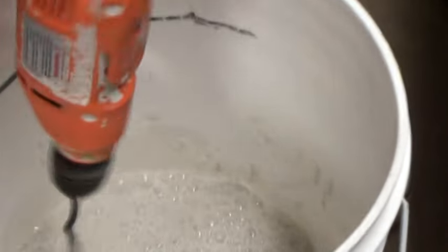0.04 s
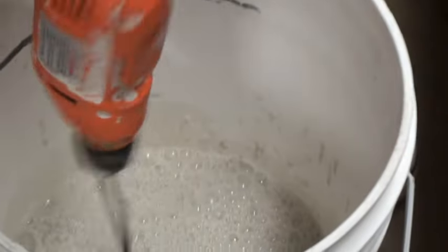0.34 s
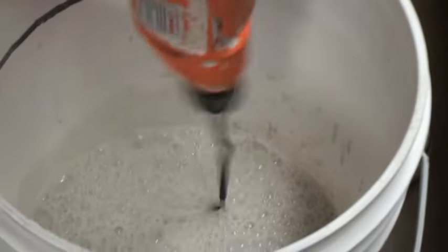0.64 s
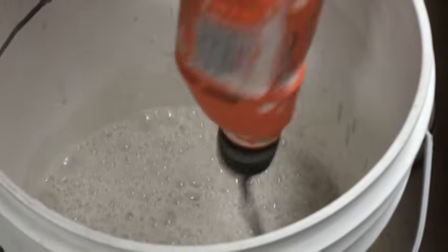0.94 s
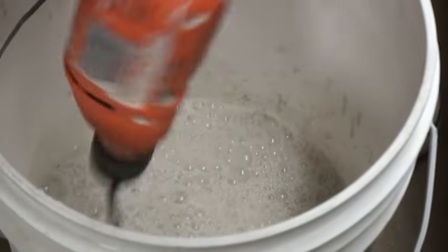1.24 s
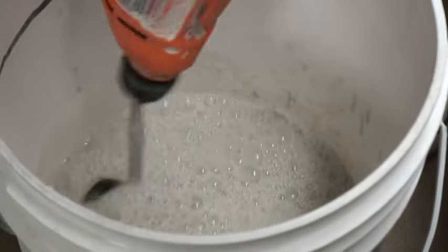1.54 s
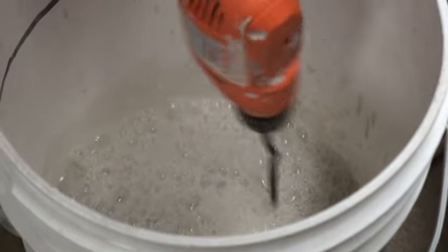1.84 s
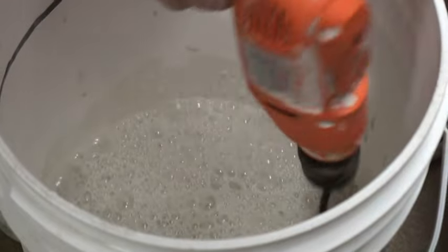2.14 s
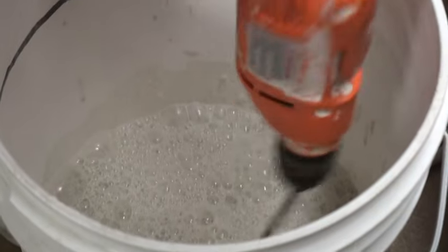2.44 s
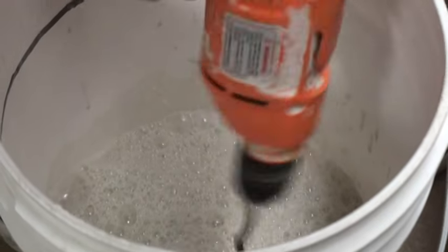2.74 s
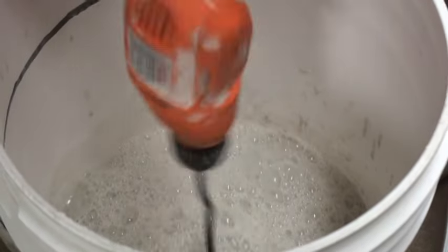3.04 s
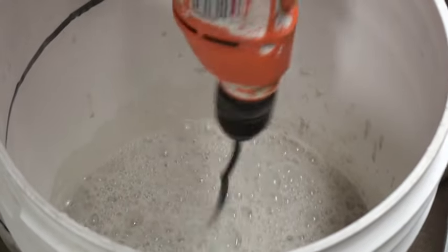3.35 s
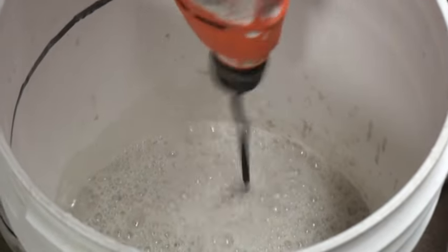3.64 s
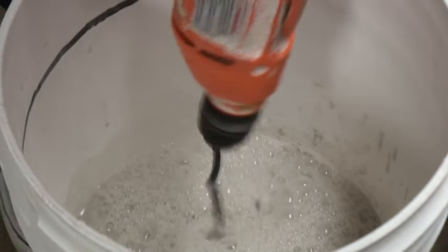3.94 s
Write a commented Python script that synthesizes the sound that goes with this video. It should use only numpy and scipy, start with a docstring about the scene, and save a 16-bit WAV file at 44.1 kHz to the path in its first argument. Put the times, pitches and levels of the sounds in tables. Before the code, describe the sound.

Close up in a room, an electric drill starts fast and raspy, sinks low, revs up, sinks again and picks up. Its wire stirrer knocks hollowly against a plastic bucket, twice hard, while water churns quietly underneath.

```python
"""An electric drill spins a bent wire in a plastic bucket of soapy water. It starts fast: the motor
whines, brushes and gears rasp, the water churns and the bucket hums along. After about a second
the wire knocks on the wall several times, once hard. The trigger eases and the drill sinks low
and quiet. Just past two seconds it speeds up, with another hard knock. It slows again around
three seconds, then picks up once more, with a few lighter knocks along the way."""
import sys
import numpy as np
from scipy import signal
from scipy.fft import rfft, irfft
from scipy.io import wavfile

SR = 44100
rng = np.random.default_rng(int(sys.argv[2]) if len(sys.argv) > 2 else 0)


def generate_wav(sig):
    """Save sig (samples, or channels by samples) to the path in sys.argv[1] as 16-bit PCM at SR."""
    pcm = np.round(np.clip(np.atleast_2d(sig).T, -1, 1) * 32767).astype(np.int16)
    wavfile.write(sys.argv[1], SR, pcm)


N = 176400   # 4 seconds
T = np.arange(N) / SR


# How fast the trigger makes the motor turn: (time [s], speed [turns per second])
MOTOR_SPEED = [(0, 502), (.13, 514.5), (.29, 525), (.45, 512), (.61, 496), (.72, 450), (.86, 446),
               (1.02, 416), (1.22, 484), (1.3, 457), (1.54, 314), (1.66, 255), (2.2, 280), (2.27, 305),
               (2.32, 362), (2.46, 463), (2.54, 475), (2.64, 498), (2.8, 474), (2.88, 426), (2.95, 336),
               (3.05, 340), (3.13, 272), (3.34, 275), (3.45, 328), (3.6, 397), (3.75, 448), (4, 437)]
def motor_speed():
    """The motor follows the trigger, with a slight wobble."""
    return in_time(MOTOR_SPEED) * (1 + 0.005006 * drift(25.6))


FULL_SPEED_HZ = 532
# How loud the drill is overall: (time [s], level [dB])
DRILL_LEVEL = [(0, -28.5), (.27, -29), (.5, -27.5), (.78, -29), (1.0, -28.5), (1.14, -27.5), (1.3, -28),
               (1.52, -36.5), (1.7, -42), (1.84, -45), (1.89, -38.5), (2.15, -41), (2.25, -37), (2.29, -33),
               (2.46, -28.5), (2.7, -28.5), (2.9, -30.5), (3.13, -39.5), (3.3, -37.5), (3.48, -32.5),
               (3.7, -30), (4, -30)]
def drill(speed, angle):
    """All the drill's sounds together. Tones, whines and above all the buzz grow with speed."""
    pace = speed / FULL_SPEED_HZ
    pitched = housing(motor_tones(angle) * pace ** 2.2 + whines(angle) * pace ** 3.8 + growl(angle))
    chuck_angle = angle / 15.5   # gears slow down the chuck, the clamp that holds the wire
    scraping = friction(chuck_angle)
    swell = 1 + 0.015 * np.cos(chuck_angle)   # once per chuck turn
    flicker = swell * from_db(1.03 * drift(64))
    return from_db(in_time(DRILL_LEVEL)) * (rasp(scraping * flicker) + pitched + buzz(flicker) * pace ** 14)


# The motor's tones: (pitch [times the motor speed], level at full speed [dB])
MOTOR_TONES = [(1, -16.5), (2, -20.5), (3, -24.5)]
TONE_ROUGHNESS = .48
def motor_tones(angle):
    """The spinning motor hums; each tone trembles in strength and timing."""
    tones = 0
    for multiple, db in MOTOR_TONES:
        strength = from_db(db) * (1 + TONE_ROUGHNESS * drift(35))
        tones += strength * np.sqrt(2) * np.sin(multiple * (angle + .33 * drift(42)))
    return tones


# Whines of gears and brushes: (pitch [times the motor speed], level at full speed [dB])
ROUGH_WHINES = [(7.15, -17.5), (7.75, -14), (10.9, -16), (12.1, -14), (15.7, -12.5)]
def whines(angle, smear=0.035):
    """Gears and brushes make rough, high tones that follow the motor."""
    return sum(from_db(db) * smeared(multiple * angle, smear * multiple * FULL_SPEED_HZ)
               for multiple, db in ROUGH_WHINES)


# How strong the growl is within the drill: (time [s], level [dB])
GROWL_LEVEL = [(0, -16), (.78, -28.5), (.88, -13.5), (1.05, -18), (1.4, -17.5), (2.35, -26), (2.6, -12.5),
               (2.85, -14), (3.1, -19.5), (3.9, -18.5)]
def growl(angle):
    """Gear teeth meet unevenly and make one very rough tone."""
    return from_db(in_time(GROWL_LEVEL)) * smeared(4.85 * angle, width_hz=320)


def friction(chuck_angle, bumps=1500, gear_share=.45):
    """Gear grit that repeats on every chuck turn, hiss from fan and brushes, and chattering clicks."""
    bump_angles = np.linspace(0, 2 * np.pi, bumps, endpoint=False)
    grit = rms_one(np.interp(chuck_angle, bump_angles, rng.standard_normal(bumps), period=2 * np.pi))
    hiss = rng.standard_normal(N)
    chatter = from_db(-7.5) * rms_one(clicks(per_s=500, spread_db=2.5))
    return np.sqrt(gear_share) * grit + np.sqrt(1 - gear_share) * hiss + chatter


# The rasp's tone, from bass to treble: (frequency [Hz], level [dB])
RASP_COLOUR = [(150, -21.5), (400, -12), (850, -5.5), (1200, -11.5), (1900, -5), (3000, -3), (4800, -4),
               (6600, 0), (7800, -4.5), (9000, -10.5), (10500, -8), (14500, -18), (16000, -57)]
def rasp(scraping):
    """The scraping of brushes and gears comes through the housing as a bright rasp."""
    return from_db(-1.5) * rms_one(housing(coloured(scraping, RASP_COLOUR)))


# Where the housing buzzes: (frequency [Hz], width [Hz], level at full speed [dB])
BUZZ_BANDS = [(1500, 110, -9.5), (3480, 450, -9.5), (5890, 460, -6), (6230, 1000, -0.5),
              (10600, 860, -11.5)]
def buzz(flicker):
    """The housing buzzes in bands of flickering noise."""
    return sum(from_db(db) * resonant(rng.standard_normal(N) * flicker, hz, width)
               for hz, width, db in BUZZ_BANDS)


# Where the drill's shell rings: (frequency [Hz], width [Hz], boost [dB])
HOUSING_RINGS = [(1446, 67, 7.5), (1638, 50, 5.5), (2260, 510, 2), (2655, 73, 5.5), (3783, 440, 5.5),
                 (4450, 290, 3.5), (5760, 630, 2.5)]
def housing(x):
    """The shell strengthens any sound near its own ringing pitches."""
    return boosted(x, HOUSING_RINGS)


# The wire's hits: (time [s], thud [dB], thud's treble limit [Hz], boom [dB], tick [dB], tick centre [Hz])
WIRE_HITS = [(.187, -40, 2520, -37, -43, 2960), (0.456, -43, 2480, -49, -36, 3000),
             (.918, -34, 400, -39, -50, 2500), (0.974, -26, 398, -33, -41, 2500),
             (1.017, -44, 400, -36, -31, 2500), (1.0707, -14, 775, -22.5, -21.5, 2620),
             (1.176, -26, 2996, -28, -22, 3970), (1.286, -30, 1400, -30, -28, 7935),
             (1.338, -29, 1700, -24.5, -46, 1500), (1.455, -35, 2500, -38, -33, 2500),
             (2.2628, -26.5, 800.8, -29, -26.5, 3500), (2.3923, -16.5, 1620, -21.5, -32, 4000),
             (2.606, -33.5, 1987, -35.5, -33, 2996), (2.737, -31, 600.3, -34, -48, 2500),
             (2.844, -30, 397, -37, -45, 2500), (3.193, -28, 600, -30.5, -55, 2500),
             (3.539, -34.5, 1180, -37, -34.5, 2500), (3.703, -34, 1100, -46, -36, 2500)]
def knocks():
    """Each hit of the wire makes the wall thud, the whole bucket boom and the contact point tick."""
    out, t = np.zeros(N + SR), T[:SR // 2]
    for time_s, thud_db, treble_hz, boom_db, tick_db, tick_hz in WIRE_HITS:
        thud = from_db(thud_db) * filtered(wall_thud(t), treble_hz, "low", order=3)
        hit = thud + from_db(boom_db) * bucket_boom(t) + from_db(tick_db) * wire_tick(t, tick_hz)
        start = int(time_s * SR)
        out[start:start + len(t)] += hit
    return out[:N]


# The notes of the struck wall: (pitch [Hz], level [dB], time to fade by 60 dB [s])
WALL_NOTES = [(190, -34.5, .12), (247, -20, 0.11), (313, -7, 0.064), (361, -18, 0.13), (435, -24.5, 0.042),
              (526, -7, 0.019), (674, -12.5, 0.063), (755, -12.5, 0.094), (1010, -31, 0.025),
              (1234, -15.5, 0.16), (1485, -11, 0.16), (1780, -11, 0.08)]
def wall_thud(t):
    """The plastic rings a little differently each time, with a quick slap and a longer shudder."""
    notes = 0
    for hz, db, fade_s in WALL_NOTES:
        strength = from_db(db + rng.normal(0, 2))
        notes += strength * np.sin(2 * np.pi * hz * rng.normal(1, 0.018) * t) * fade(t, fade_s)
    slap = from_db(-3.5) * fade(t, 0.048)
    shudder = from_db(-5.5) * fade(t, 0.34)
    noise = rms_one(filtered(rng.standard_normal(len(t)), [220, 2200], "band"))
    # a small bucket gives off little deep bass
    return filtered(notes + noise * (slap + shudder), 179, "high", order=3)


def bucket_boom(t, hz=232.7, fade_s=0.15, rise_s=0.0031):
    """The whole bucket swings with one low note."""
    note = np.sin(2 * np.pi * hz * rng.normal(1, 0.034) * t)
    return note * fade(t, fade_s) * (1 - np.exp(-t / rise_s))


def wire_tick(t, hz, fade_s=0.043, bounce_s=0.0046):
    """A bright double tick: the wire touches, bounces and touches again more softly."""
    bounce = from_db(-5.5) * (t > bounce_s) * fade(abs(t - bounce_s), fade_s)
    noise = rms_one(filtered(rng.standard_normal(len(t)), [hz / 1.8, hz * 1.8], "band", order=1))
    return noise * (fade(t, fade_s) + bounce)


# How loud the wall drones: (time [s], level [dB])
DRONE_LEVEL = [(0, -42), (.55, -45), (.95, -40), (1.2, -46), (1.5, -47.5), (1.72, -51), (1.9, -47.5),
               (2.2, -45.5), (2.3, -39.5), (2.55, -41.5), (2.85, -41.5), (2.98, -46), (3.15, -46.5),
               (3.44, -43.5), (3.72, -41.5), (4, -47.5)]
# Where the stirred wall rings: (frequency [Hz], width [Hz], level [dB])
WALL_RINGS = [(644, 46, -2), (593, 170, -4), (703, 30, -8), (799, 50, -8.5)]
def wall_drone(angle, sing_hz=657, sing_width_hz=67):
    """Stirring keeps the wall ringing; it sings out when the motor's shaking matches its pitch."""
    rubbing = filtered(rng.standard_normal((len(WALL_RINGS), N)), [450, 1000], "band")
    rings = sum(from_db(db) * resonant(x, hz, width) for x, (hz, width, db) in zip(rubbing, WALL_RINGS))
    shaking = np.sqrt(2) * np.sin(2 * angle) * (1 + TONE_ROUGHNESS * drift(26))
    wall_filter = signal.iirpeak(sing_hz, sing_hz / sing_width_hz, fs=SR)
    singing = signal.lfilter(*wall_filter, signal.lfilter(*wall_filter, shaking))
    return from_db(in_time(DRONE_LEVEL)) * (rms_one(rings) + from_db(3) * singing)


# How loud the water churns: (time [s], level [dB])
WATER_LEVEL = [(0, -45.5), (.7, -48.5), (.95, -46), (1.2, -50), (1.4, -44.5), (1.7, -48.5), (2.2, -48),
               (2.7, -45.5), (3.05, -45.5), (3.5, -47), (4, -44.5)]
# The water's tone, from bass to treble: (frequency [Hz], level [dB])
WATER_COLOUR = [(25, -33), (60, -6.5), (90, -7), (140, 0), (230, -2), (330, -1), (500, -11), (800, -19),
                (1100, -9.5), (2500, -27), (9000, -39), (16000, -49)]
# Where the air in the bucket hums: (frequency [Hz], width [Hz], boost [dB])
AIR_HUMS = [(171.7, 9.1, 8.5), (235, 91, 9.5), (107.5, 2.9, 12)]
def water(bubbles_per_s=150, fade_cycles=19):
    """Water churns unevenly in the hollow bucket while small bubbles ring briefly."""
    lumps = rng.standard_normal(N) * from_db(1.34 * drift(21))
    churn = rms_one(boosted(coloured(lumps, WATER_COLOUR), AIR_HUMS))
    pitches = np.geomspace(350, 2600, 20)
    bubbles = sum(ring(clicks(bubbles_per_s / len(pitches), spread_db=3), hz, fade_cycles / hz)
                  for hz in pitches)
    return from_db(in_time(WATER_LEVEL)) * (churn + from_db(-6.5) * rms_one(bubbles))


def foam():
    """Foam bubbles burst with tiny, bright clicks."""
    pops = clicks(per_s=150, spread_db=1.0)
    return from_db(-57) * rms_one(filtered(pops, [3000, 14000], "band", order=1))


def room(x, fade_s=0.089):
    """The room sends back a short blur of echoes, different at each ear."""
    t = T[:SR // 2]
    noise = filtered(rng.standard_normal((2, len(t))), 380, "high", order=1)
    echoes = filtered(noise, 10700, "low", order=8) * fade(t, fade_s) * (t > .003)
    echoes /= np.sqrt(np.sum(echoes ** 2, axis=1, keepdims=True) * 2)
    return signal.fftconvolve(x[None], echoes, axes=1)[:, :N]


def from_db(db):
    """Turn decibels into a number to multiply by."""
    return 10 ** (np.asarray(db) / 20)


def rms_one(x):
    """Scale a sound to an average power of 1."""
    return x / np.sqrt(np.mean(x ** 2) + 1e-20)


def in_time(rows):
    """Join (time, value) points with straight lines."""
    return np.interp(T, *np.transpose(rows))


def fade(t, fade_s):
    """Die away by 60 dB every fade_s seconds."""
    return np.exp(-np.log(1000) * t / fade_s)


def drift(rate_hz, step=40):
    """A smooth random wander, about 1 in size."""
    r = np.exp(-2 * np.pi * step * rate_hz / SR)
    slow = signal.lfilter([1], [1, -2 * r, r * r], rng.standard_normal(N // step + 2002))[2000:]
    return np.interp(np.arange(N) / step, np.arange(len(slow)), rms_one(slow))


def clicks(per_s, spread_db):
    """Random clicks of uneven size."""
    spikes = (rng.random(N) < per_s / SR) * rng.choice([-1, 1], N)
    return spikes * from_db(spread_db * np.minimum(rng.exponential(1, N), 4))


def filtered(x, hz, kind, order=2):
    """Keep the lows, the highs or a band between."""
    return signal.sosfilt(signal.butter(order, np.clip(hz, 10, .45 * SR), kind, fs=SR, output="sos"), x)


def smeared(phase, width_hz):
    """A tone broken up by uneven contact; power 1."""
    a, b = filtered(rng.standard_normal((2, N)), width_hz / 2, "low")
    return rms_one(a * np.sin(phase) + b * np.cos(phase))


def ring(x, hz, fade_s):
    """Each click in x starts a fading note."""
    r, w = fade(1 / SR, fade_s), 2 * np.pi * hz / SR
    return signal.lfilter([0, np.sin(w)], [1, -2 * r * np.cos(w), r * r], x + 1e-18)


def resonant(x, hz, width):
    """Make a sound ring around one pitch; power 1."""
    return rms_one(ring(x - np.roll(x, 2), hz, np.log(1000) / (np.pi * width)))


def coloured(x, colour):
    """Shape a sound's balance of bass and treble."""
    hz, db = np.transpose(colour)
    level = np.interp(np.log(np.fft.rfftfreq(N, 1 / SR) + 1), np.log(hz), db)
    return irfft(rfft(x) * from_db(level), N)


def boosted(x, rings):
    """Turn a sound up around each ringing pitch."""
    f = np.fft.rfftfreq(N, 1 / SR)
    boost = sum(db / (1 + (2 * (f - hz) / width) ** 2) for hz, width, db in rings)
    return irfft(rfft(x) * from_db(boost), N)


def scene(pan_db=.5, room_db=-9.5):
    """The drill slightly to the right and the bucket in the middle, in one room."""
    speed = motor_speed()
    angle = 2 * np.pi * np.cumsum(speed) / SR   # how far the motor has turned
    motor = drill(speed, angle)
    bucket = filtered(water() + wall_drone(angle) + foam() + knocks(), 35, "high")
    return motor * from_db([[-pan_db], [pan_db]]) + bucket + from_db(room_db) * room(motor + bucket)


def record(dry, cutoff_hz=15600):
    """Cut away the very highest treble."""
    return signal.sosfilt(signal.ellip(10, .2, 80, cutoff_hz, fs=SR, output="sos"), dry)


dry = scene()
out = record(dry)
generate_wav(out)
```